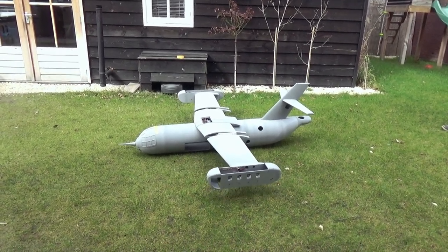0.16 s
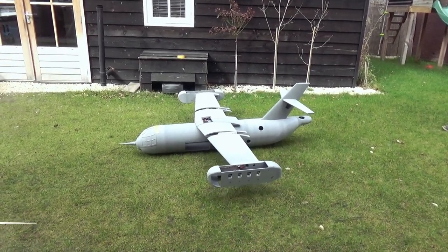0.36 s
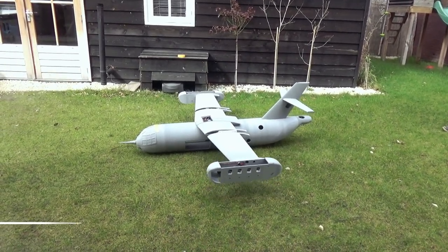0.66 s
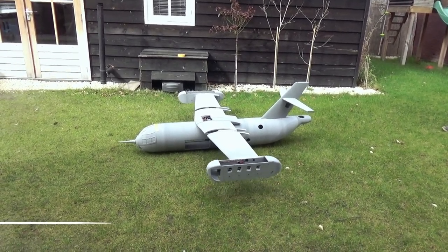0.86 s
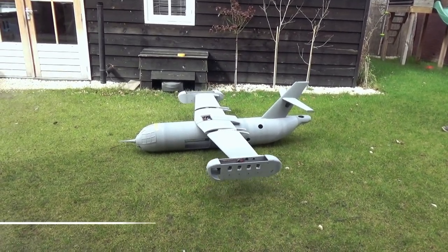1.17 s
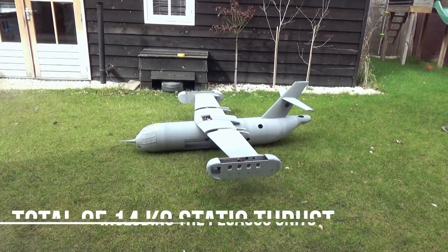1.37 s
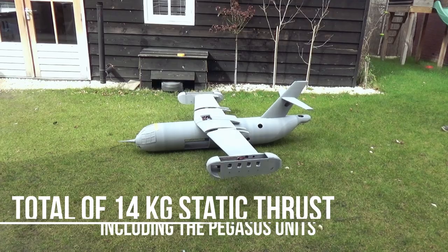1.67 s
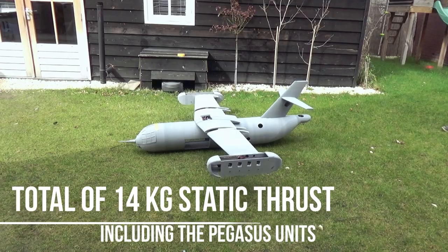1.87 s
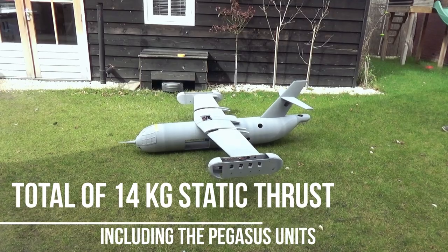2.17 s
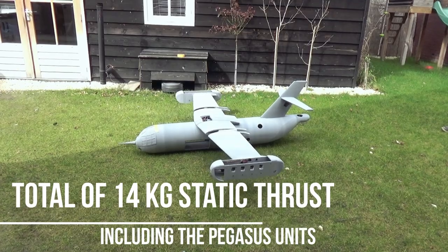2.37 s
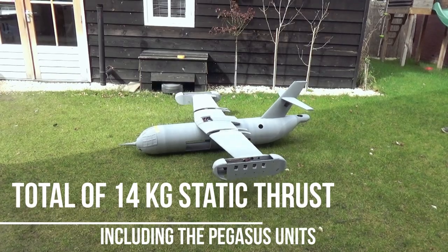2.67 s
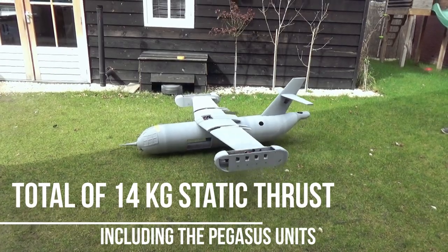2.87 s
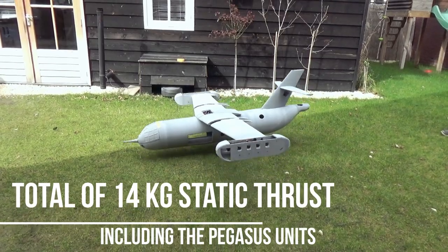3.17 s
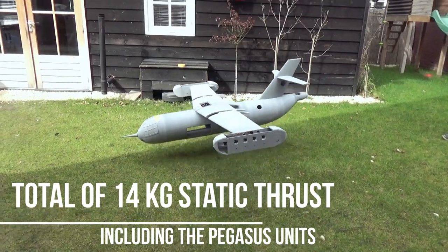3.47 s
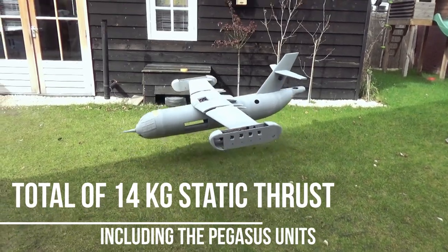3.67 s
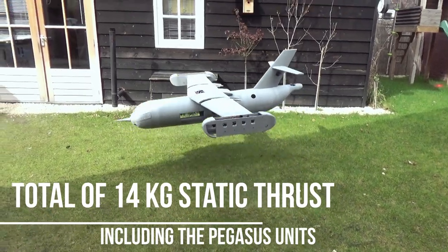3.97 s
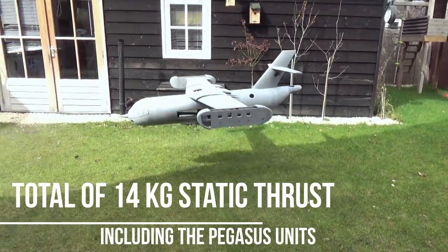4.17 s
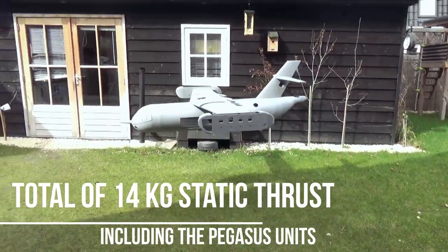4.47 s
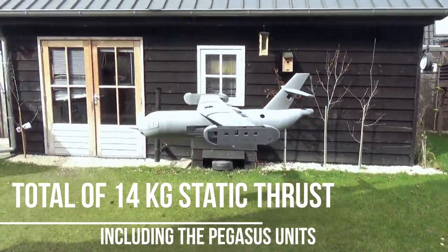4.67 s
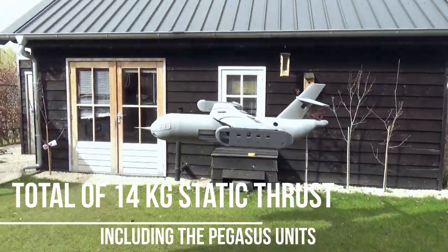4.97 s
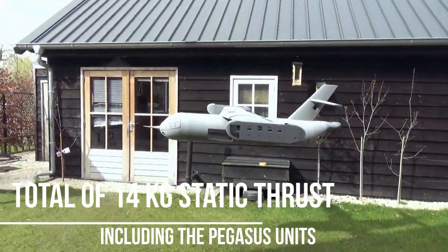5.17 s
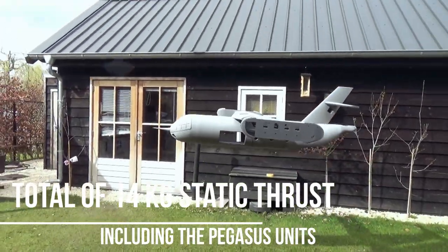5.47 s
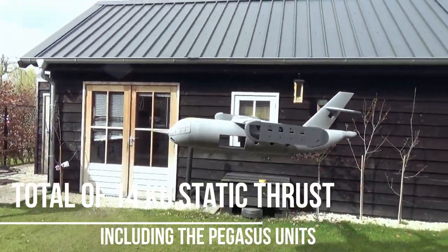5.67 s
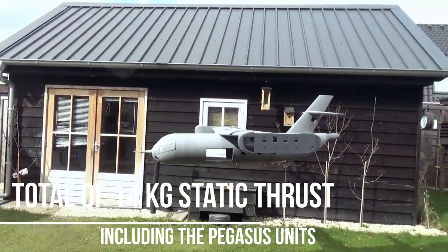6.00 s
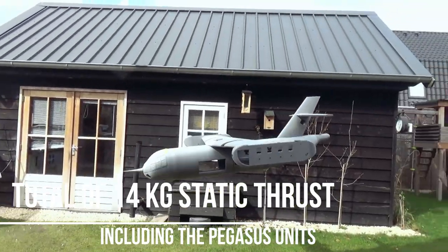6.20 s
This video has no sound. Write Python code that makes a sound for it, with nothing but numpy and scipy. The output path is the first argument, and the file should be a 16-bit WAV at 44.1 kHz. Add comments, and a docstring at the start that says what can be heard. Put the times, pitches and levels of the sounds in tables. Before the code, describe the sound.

A large model jet's lift fans spool up to a piercing, hissing whine over a low hum, then it lifts off a lawn and hovers.

```python
"""Six lift fans of a model jump jet spool up on a lawn by a shed, then the jet lifts off and hovers.
Each fan hums at its shaft rate and whines at its blade rate; unequal speeds make the fans beat.
Two main fans hum below, a balancing fan strays from their speed, and a duct whistles near full power.
Behind them noise makes jet rush, roar, hiss and rasp; rush and airframe drone thin out off the grass.
The jet is straight ahead of the stereo microphone; a late, filtered copy of its tones gives some width."""
import sys
import numpy as np
from scipy import signal
from scipy.fft import rfft, irfft, next_fast_len
from scipy.io import wavfile

SR = 44100
rng = np.random.default_rng(int(sys.argv[2]) if len(sys.argv) > 2 else 0)


def generate_wav(sig):
    """Save sig (samples, or channels by samples) to the path in sys.argv[1] as 16-bit PCM at SR."""
    pcm = np.round(np.clip(np.atleast_2d(sig).T, -1, 1) * 32767).astype(np.int16)
    wavfile.write(sys.argv[1], SR, pcm)


N = 279594
TIME_S = np.arange(N) / SR
BLADES = 12  # per fan


def from_db(db):
    """Decibels to amplitude gain."""
    return 10 ** (np.asarray(db) / 20)


def rms_one(x):
    """Scale to unit power."""
    return x / np.sqrt(np.mean(x ** 2) + 1e-20)


def in_time(rows):
    """Draw each column after the first as a curve over time, straight between the rows."""
    start_s, *columns = np.transpose(rows)
    return [np.interp(TIME_S, start_s, column) for column in columns]


def coloured(x, spectrum):
    """Filter by a (freq_hz, level_db) curve, joined by straight lines over log frequency."""
    freq_hz, level_db = np.transpose(spectrum)
    size = next_fast_len(N + 4096)  # padding for the filter's tail
    bins_hz = np.maximum(np.fft.rfftfreq(size, 1 / SR), 1)
    gain = from_db(np.interp(np.log(bins_hz), np.log(freq_hz), level_db))
    return irfft(rfft(x, size) * gain, size)[:N]


def air_noise(spectrum):
    """Turbulence as white noise filtered to a given colour, rms 1."""
    return rms_one(coloured(rng.standard_normal(N), spectrum))


def drift(rate_hz):
    """Smooth random wandering of rms 1: noise through two equal poles at the given rate."""
    # drawn at a tenth of the sample rate; the first 8000 values let the filter settle
    pole = np.exp(-20 * np.pi * rate_hz / SR)
    noise = rng.standard_normal(N // 10 + 8002)
    slow = signal.lfilter([1], [1, -2 * pole, pole * pole], noise)[8000:]
    return np.interp(np.arange(N) / 10, np.arange(len(slow)), rms_one(slow))


def angle(freq_hz):
    """Running phase in radians of a changing frequency."""
    return 2 * np.pi * np.cumsum(freq_hz) / SR


def tone(phase, rough, width_hz):
    """A line of rms near 1; turbulence turns a share of it into a narrow skirt of noise."""
    rough = np.clip(rough, 0, 1)
    steady = np.sqrt(2 * (1 - rough ** 2))
    phase = (phase % (2 * np.pi)).astype(np.float32)
    in_phase = (steady + rough * drift(width_hz)) * np.cos(phase)
    quadrature = rough * drift(width_hz) * np.sin(phase)
    return in_phase + quadrature


def swell(centre_s, half_length_s):
    """A smooth bell-shaped rise to 1 and fall around a moment."""
    return np.exp(-((TIME_S - centre_s) / half_length_s) ** 2)


def switch(x, width):
    """A soft step from 0 to 1 as x passes zero."""
    return .5 + .5 * np.tanh(x / width)


def speed_gain(shaft_hz, full_db, full_hz, db_per_hz):
    """A gain whose decibels change steadily with shaft rate and hold from full_hz on."""
    return from_db(full_db + db_per_hz * np.minimum(shaft_hz - full_hz, 0))


LIFT_OFF_S, CLIMB_S = 2.1, 2.5  # start and length of the climb to the hover


def with_climb(on_grass, aloft):
    """A quantity that eases from one value to another as the aircraft rises."""
    done = np.clip((TIME_S - LIFT_OFF_S) / CLIMB_S, 0, 1)
    return on_grass + (aloft - on_grass) * np.sin(np.pi / 2 * done) ** 2


def whine_gain(shaft_hz):
    """The lift fans' gain grows early in the spool-up, then holds."""
    return speed_gain(shaft_hz, full_db=-21.8, full_hz=590, db_per_hz=.065)


# Low resonances of the airframe: pitch_hz, half_width_hz, level_db (against one another)
AIRFRAME_MODES = [(76, 4.8, -2), (165.2, 29, 5), (209, 35, 8), (251, 18, 7), (396, 25, 9)]
DRONE_ON_GRASS_DB, DRONE_ALOFT_DB = -62, -78.5  # added to the table's levels


def airframe():
    """The shell drones in a few roughened low resonances, loudest on the grass."""
    modes = 0
    for pitch_hz, half_width_hz, level_db in AIRFRAME_MODES:
        turn = angle(np.full(N, pitch_hz))
        modes = modes + from_db(level_db) * tone(turn, rough=0.81, width_hz=half_width_hz)
    return from_db(with_climb(DRONE_ON_GRASS_DB, DRONE_ALOFT_DB)) * modes


REST_M, HOVER_M = .15, 1.1  # height above the lawn
ECHO_S_PER_M = 0.001905  # delay of the bounce per metre of height


def lawn_echo(x, share, dull_hz):
    """The duller bounce off the grass comes later with height, sweeping a comb; the sum has rms 1."""
    lag_samples = ECHO_S_PER_M * with_climb(REST_M, HOVER_M) * SR
    lowpass = signal.butter(1, min(dull_hz, SR / 4), fs=SR, output="sos")
    bounce = signal.sosfilt(lowpass, x)
    return rms_one(x + share * np.interp(np.arange(N) - lag_samples, np.arange(N), bounce))


# Colours of the jets' air, each: freq_hz, level_db (relative, per Hz)
RUSH_COLOUR = [(25, -34), (55, -12), (110, -7.5), (165, -3), (215, 3.5), (320, -13.5), (400, -17),
               (500, -20), (800, -27.5)]  # low exhaust rush
ROAR_COLOUR = [(120, -18), (300, -3), (600, 1.5), (950, 1), (1300, -0.5), (2300, 2.5), (3000, 1),
               (3800, 1.5), (4600, -1.5), (6000, 4), (9000, -17.5)]  # exhaust roar
HISS_COLOUR = [(4000, -21.5), (5100, -17), (5700, -4), (6500, 2.5), (7100, 5.5), (7800, 3.5), (9000, 3.5),
               (10400, 4), (11500, 2.5), (13500, 1), (15700, -0.5)]  # blade hiss
RASP_COLOUR = [(2200, -21), (2950, 5.5), (3350, 0), (3750, 8), (4200, 2), (4900, -42)]  # rasp in the ducts
# Brief swells of the roar: centre_s, half_length_s, rise_db
ROAR_RISES = [(1.95, .35, 1.8), (5.65, .25, 2.4)]
RUSH_ON_GRASS_DB, RUSH_ALOFT_DB = -51, -55.5
RASP_DB, RASP_ENDS_S, RASP_FADE_S = -42, .69, .015  # clears abruptly during the spool-up


def jets(rush_gust_db, roar_db, roar_gust_db):
    """Exhaust rush and roar, blade hiss that eases as the fans gain speed, and duct rasp."""
    shaft_hz, = in_time(LIFT_FAN_SPEED)
    rush_db = with_climb(RUSH_ON_GRASS_DB, RUSH_ALOFT_DB) + rush_gust_db * drift(3)
    rush = from_db(rush_db) * air_noise(RUSH_COLOUR)

    swells_db = sum(rise_db * swell(centre_s, half_s) for centre_s, half_s, rise_db in ROAR_RISES)
    roar_gain = from_db(roar_db + swells_db + roar_gust_db * drift(7))
    roar = roar_gain * lawn_echo(air_noise(ROAR_COLOUR), share=0.11, dull_hz=3880)

    gusts = from_db(.7 * drift(8))
    hiss_gain = speed_gain(shaft_hz, full_db=-25.3, full_hz=790, db_per_hz=-.01)
    hiss = hiss_gain * gusts * air_noise(HISS_COLOUR)

    rasp_gain = from_db(RASP_DB) * switch(RASP_ENDS_S - TIME_S, RASP_FADE_S)
    rasp = rasp_gain * air_noise(RASP_COLOUR)
    return rush + roar + hiss + rasp


WHISTLE_STARTS_S, WHISTLE_FADE_S, WHISTLE_DB = 2.62, .08, -34.5
# lower pitch at the reference shaft rate, and how little it follows the fans
WHISTLE_HZ, HOVER_SHAFT_HZ, WHISTLE_HZ_PER_SHAFT_HZ = 6290, 760, 1.1


def duct_whistle(upper_ratio, upper_db):
    """Near full power a duct sounds a breathy, fluttering pair of pitches that barely follow the fans."""
    shaft_hz, = in_time(LIFT_FAN_SPEED)
    follow_hz = WHISTLE_HZ_PER_SHAFT_HZ * (shaft_hz - HOVER_SHAFT_HZ)
    turn = angle(WHISTLE_HZ + follow_hz + 15 * drift(8))
    lower = tone(turn, rough=.9, width_hz=55)
    upper = from_db(upper_db) * tone(upper_ratio * turn, rough=1, width_hz=140)
    onset = switch(TIME_S - WHISTLE_STARTS_S, WHISTLE_FADE_S)
    return onset * from_db(WHISTLE_DB + 1.4 * drift(14)) * (lower + upper)


def blade_wash(level_db, order, width_hz):
    """Blades chopping eddies add a broad shoulder just above the whine."""
    shaft_hz, = in_time(LIFT_FAN_SPEED)
    shoulder = tone(order * angle(shaft_hz), rough=0.99, width_hz=width_hz)
    return from_db(level_db) * whine_gain(shaft_hz) * shoulder


# The balancing fan leads, lags, races to raise the aircraft, and drops back as the nose sinks:
# centre_s, half_length_s, offset_hz (from the main fans' shaft rate), hum_db, whine_db
BALANCING_MOVES = [(.06, .13, 95, -57, -31), (.42, .2, -135, -46.5, -55), (2.13, .5, 112, -42.5, -36),
                   (2.86, .16, 44, -46, -36), (6.36, .26, -128, -39, -43)]


def trim_fan():
    """One fan leaves the main fans' speed to balance the aircraft, and stands out while it does."""
    shaft_hz, hum_gain, whine_gain_now = in_time(MAIN_FAN_SPEED)[0], 0, 0
    for centre_s, half_length_s, offset_hz, hum_db, whine_db in BALANCING_MOVES:
        move = swell(centre_s, half_length_s)
        shaft_hz = shaft_hz + offset_hz * move
        hum_gain = hum_gain + from_db(hum_db) * move
        whine_gain_now = whine_gain_now + from_db(whine_db) * move
    turn = angle(shaft_hz * (1 + 0.00205 * drift(5.58)))
    hum = hum_gain * tone(turn, rough=0.47, width_hz=12)
    whine = whine_gain_now * tone(BLADES * turn, rough=0.33, width_hz=91)
    return hum + whine


# Throttle of the main fans: start_s, shaft_hz, level_db (hum, before hum_db and fading)
MAIN_FAN_SPEED = [(0, 438, -39.3), (0.12, 457, -54.0), (0.4, 524, -51.8), (1.1, 618, -45.8),
                  (1.42, 647, -36.0), (1.7, 679, -41.7), (2.4, 728, -36.8), (2.62, 747, -50.8),
                  (2.97, 819, -32.8), (3.33, 836, -39.4), (3.5, 833, -28.2), (3.98, 813, -34.0),
                  (4.27, 831, -27.1), (4.8, 776, -38.8), (5.2, 764, -34.1), (5.75, 760, -35.9),
                  (5.97, 742, -30.2), (6.34, 780, -33.0)]
# the overtones come out as the aircraft lifts clear of the grass
OVERTONES_START_S, OVERTONES_FADE_S, OVERTONES_ON_GRASS_DB = 2.94, .04, -11
SECOND_DB = -49.5  # floor of the second harmonic, which surges near top speed
# random fading, deeper in the air
FADING_ON_GRASS_DB, FADING_ALOFT_DB, FADING_HZ = .6, 1.5, 12


def main_fans(twin_db, detune, hum_db, blade_db):
    """Two slightly unbalanced rotors hum and beat against each other, twice as fast at the octave."""
    shaft_hz, level_db = in_time(MAIN_FAN_SPEED)
    turn = angle(shaft_hz * (1 + 0.00152 * drift(8.256)))
    twin_turn = angle(shaft_hz * (1 - detune + .009 * drift(5.17)))

    twin_hum = from_db(twin_db) * tone(twin_turn, rough=0.27, width_hz=21)
    hum = rms_one(tone(turn, rough=0.24, width_hz=53) + twin_hum)
    fading_db = with_climb(FADING_ON_GRASS_DB, FADING_ALOFT_DB) * drift(FADING_HZ)
    hum = from_db(level_db + hum_db + fading_db) * hum

    twin_second = from_db(twin_db - 1.5) * tone(2 * twin_turn, rough=0.39, width_hz=25)
    second = rms_one(tone(2 * turn, rough=0.56, width_hz=23) + twin_second)
    surge = speed_gain(shaft_hz, full_db=-40, full_hz=836, db_per_hz=.32)
    third = tone(3 * turn, rough=.9, width_hz=50)
    third_gain = speed_gain(shaft_hz, full_db=-50, full_hz=755, db_per_hz=.2)
    overtones = second * (from_db(SECOND_DB) + surge) + third * third_gain
    held_back_db = OVERTONES_ON_GRASS_DB * switch(OVERTONES_START_S - TIME_S, OVERTONES_FADE_S)
    overtones *= from_db(held_back_db + 2.2 * drift(FADING_HZ))

    blade_gain = speed_gain(shaft_hz, full_db=blade_db, full_hz=820, db_per_hz=.04)
    whine = blade_gain * tone(BLADES * turn, rough=0.5, width_hz=82)
    return hum + overtones + whine


# spread of the fans' speeds as a share of the shaft rate; they draw together in flight
SPREAD_ON_GRASS, SPREAD_ALOFT = .029, .02
# the whine's octave flares as the fans start to speed up
FLARE_S, FLARE_HALF_LENGTH_S, FLARE_DB = .32, .14, 4
# Throttle of the lift fans: start_s, shaft_hz
LIFT_FAN_SPEED = [(0, 492), (0.25, 507), (0.55, 552), (0.9, 591), (1.2, 610), (1.5, 649), (2.2, 695),
                  (2.45, 751), (2.72, 783), (3.05, 781), (3.7, 822), (4.25, 813), (4.45, 782), (4.82, 811),
                  (5.2, 761), (6.08, 756), (6.34, 783)]


def lift_fans(count, wander, wander_hz, fade_db, hum_db, octave_db, octave_fall, sideband_db):
    """Fans at staggered, wandering speeds hum at the shaft rate and whine at the blade rate."""
    shaft_hz, = in_time(LIFT_FAN_SPEED)
    spread = with_climb(SPREAD_ON_GRASS, SPREAD_ALOFT)
    # the octave of the blade tone is stronger at low speed
    flare_db = FLARE_DB * swell(FLARE_S, FLARE_HALF_LENGTH_S)
    octave_gain = from_db(octave_db + flare_db) * (shaft_hz[0] / shaft_hz) ** octave_fall
    fans = 0
    for stagger in rms_one(np.linspace(-1, 1, count)):
        # the flight controller's constant nudges, as a random wander
        offset = spread * (.8 * stagger + wander * drift(wander_hz))
        turn = angle(shaft_hz * (1 + offset))
        hum = from_db(hum_db) * tone(turn, rough=0.8, width_hz=20.7)
        # eddies drawn into the intake smear the blade tone, and its octave far more
        whine = tone(BLADES * turn, rough=.8, width_hz=75)
        octave = octave_gain * tone(2 * BLADES * turn, rough=1, width_hz=300)
        # unequal blades swell the whine once every turn
        whine = whine * (1 + from_db(sideband_db) * np.cos(turn))
        # churned-up air makes each fan's whine and octave swell and fade on their own
        fans = fans + hum + (whine + octave) * from_db(fade_db * drift(11.7))
    return whine_gain(shaft_hz) * rms_one(fans)


# Stereo width of the tones: a late, filtered copy, opposite in the two channels, # mostly around the whine and
# the low hum: freq_hz, level_db (side against the tones)
STEREO_WIDTH = [(30, -26), (200, -20.5), (450, -23.5), (850, -34.5), (2000, -57), (4500, -63), (6000, -23),
                (9500, -20), (11000, -17), (12000, -63)]


def scene():
    """The aircraft stands straight ahead of the microphone; a late copy of its tones gives some width."""
    lift = lift_fans(count=6, wander=.65, wander_hz=4.5, fade_db=0.5, hum_db=-17.8,
                     octave_db=1, octave_fall=3.2, sideband_db=-6)
    tones = from_db(-0.6) * lift + blade_wash(level_db=-6, order=12.7, width_hz=1200)
    tones += main_fans(twin_db=-4.5, detune=.014, hum_db=-.1, blade_db=-29.5)
    tones += trim_fan() + airframe()
    mid = tones + duct_whistle(upper_ratio=1.118, upper_db=-8)
    mid += jets(rush_gust_db=1.5, roar_db=-37.5, roar_gust_db=.6)
    # the copy is 23 ms late, with opposite sign in the two channels
    side = coloured(np.roll(tones, round(.023 * SR)), STEREO_WIDTH)
    return np.array([mid + side, mid - side])


CUTOFF_HZ = 15750


def record(dry):
    """A long linear-phase lowpass cuts the top steeply in both channels."""
    lowpass = signal.firwin(801, CUTOFF_HZ, fs=SR)
    return signal.fftconvolve(dry, lowpass[None], mode="same", axes=1)


dry = scene()
out = record(dry)
generate_wav(out)
```